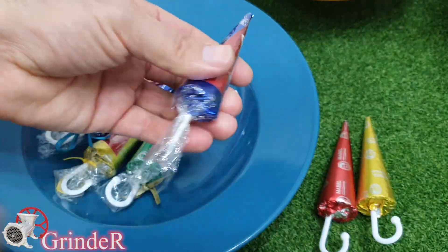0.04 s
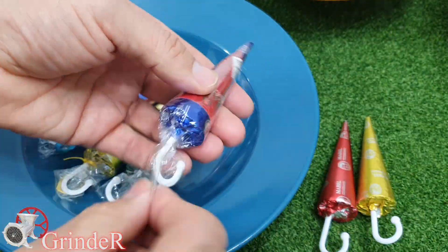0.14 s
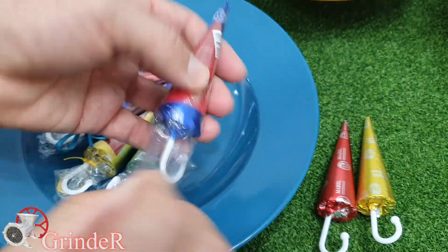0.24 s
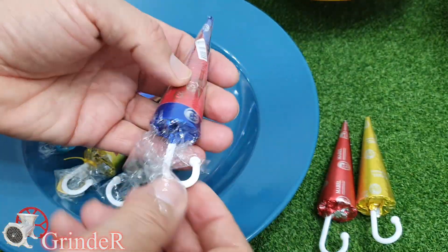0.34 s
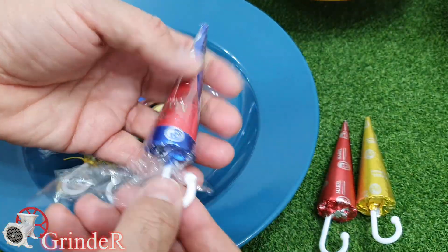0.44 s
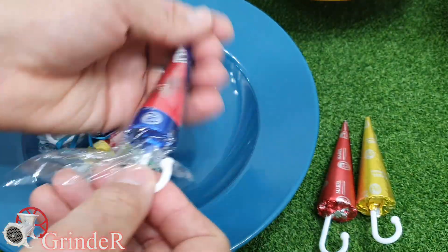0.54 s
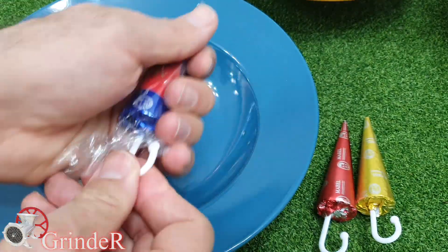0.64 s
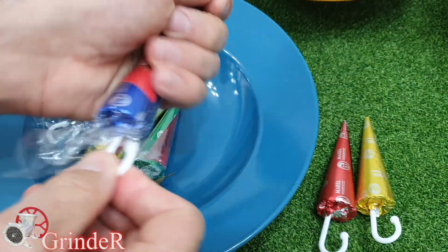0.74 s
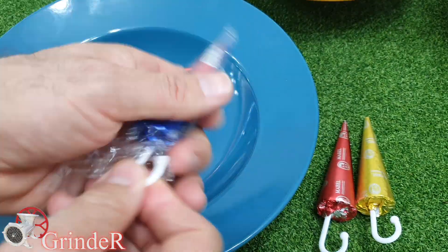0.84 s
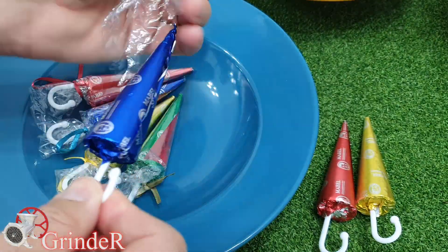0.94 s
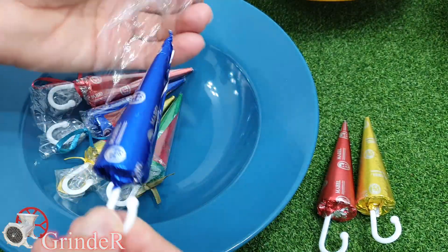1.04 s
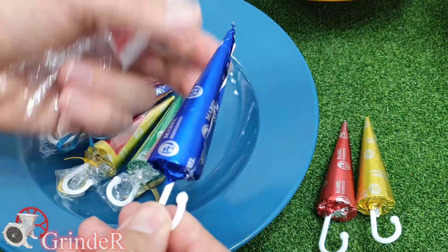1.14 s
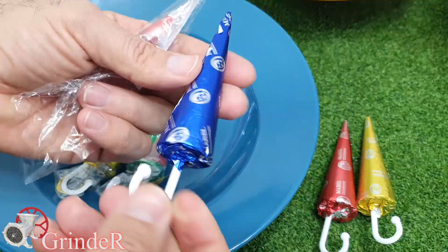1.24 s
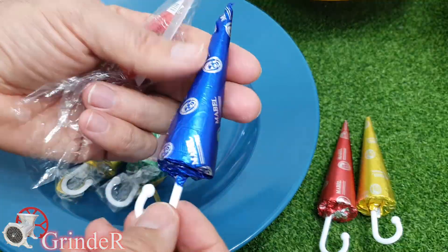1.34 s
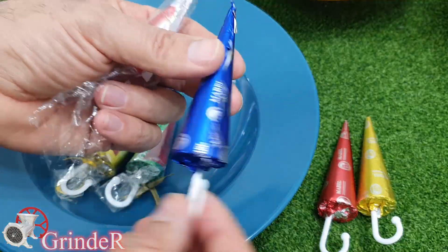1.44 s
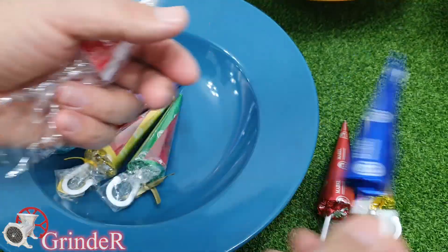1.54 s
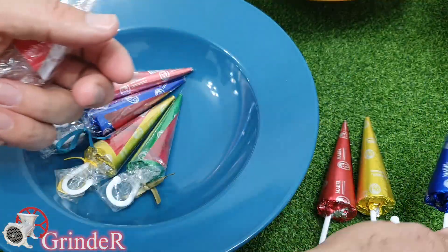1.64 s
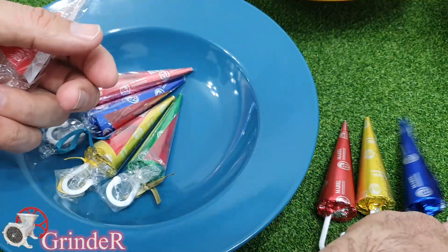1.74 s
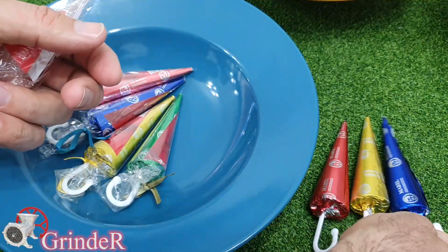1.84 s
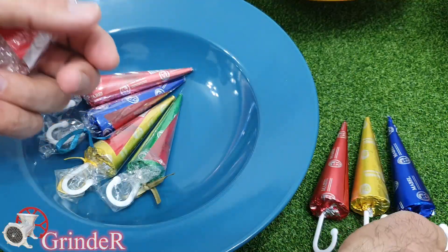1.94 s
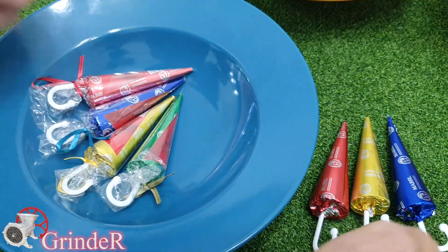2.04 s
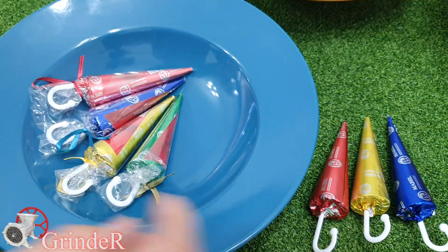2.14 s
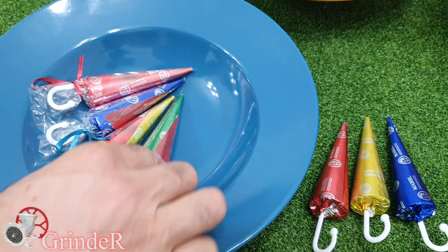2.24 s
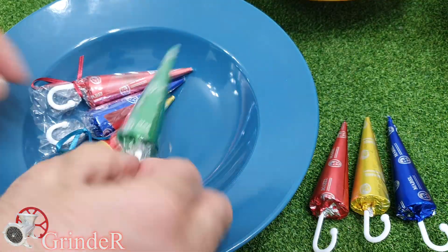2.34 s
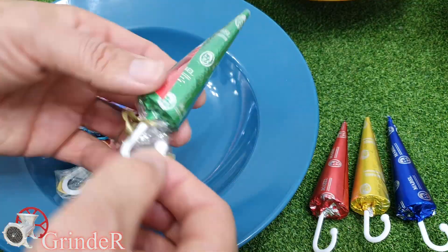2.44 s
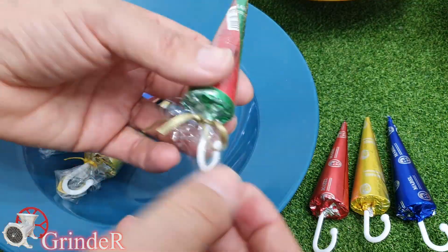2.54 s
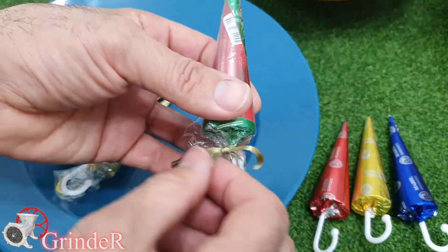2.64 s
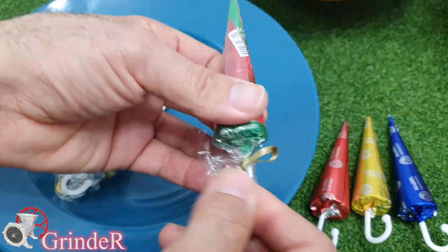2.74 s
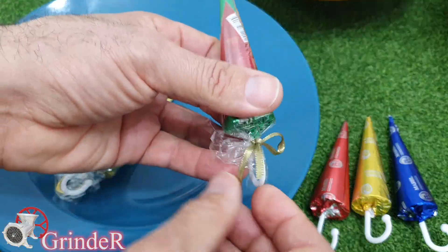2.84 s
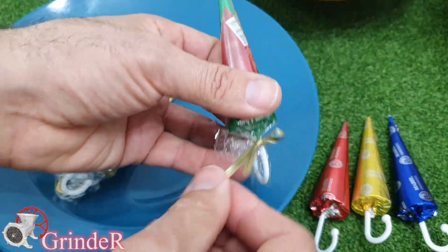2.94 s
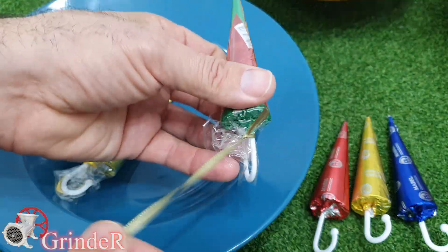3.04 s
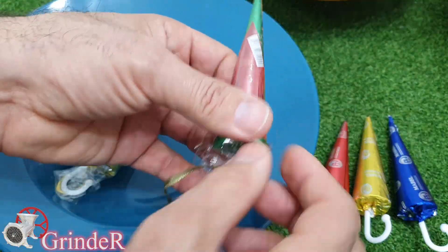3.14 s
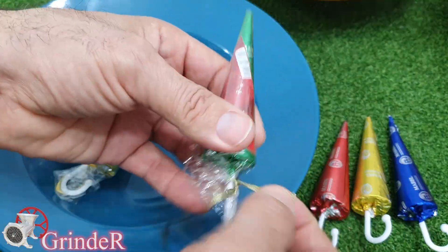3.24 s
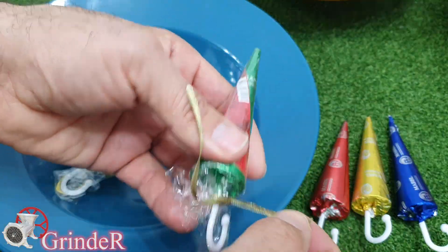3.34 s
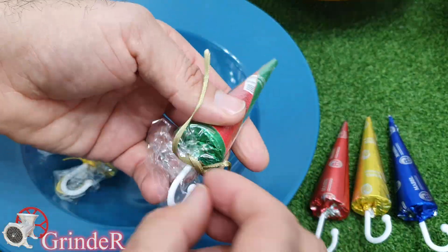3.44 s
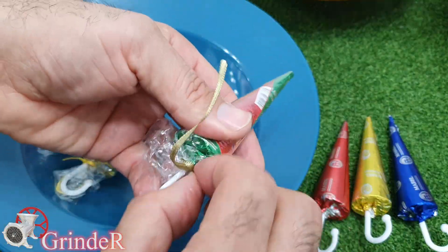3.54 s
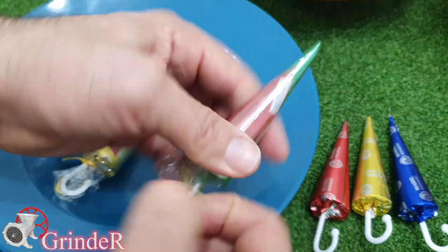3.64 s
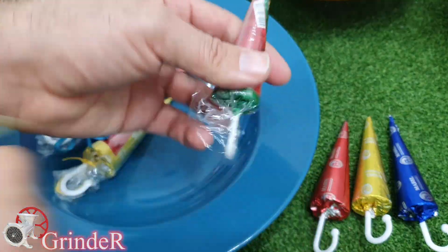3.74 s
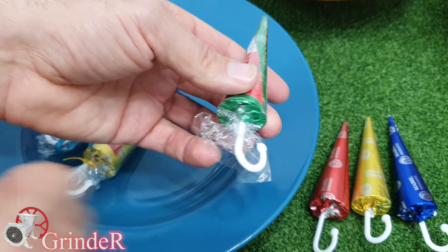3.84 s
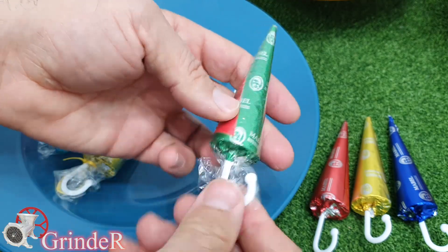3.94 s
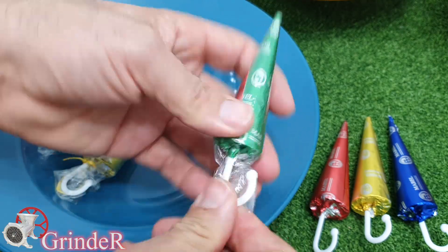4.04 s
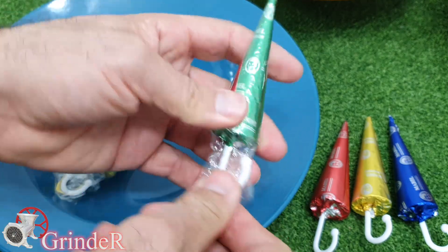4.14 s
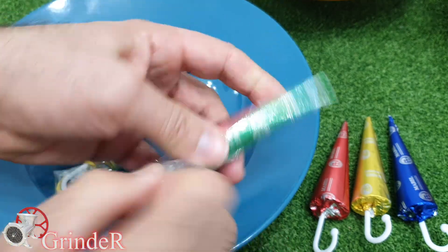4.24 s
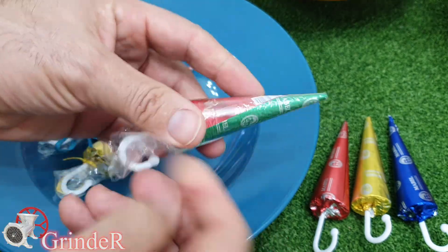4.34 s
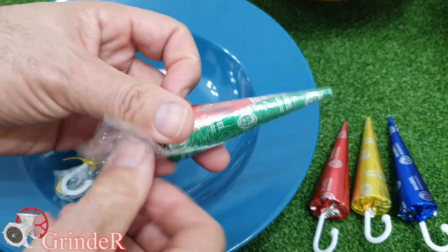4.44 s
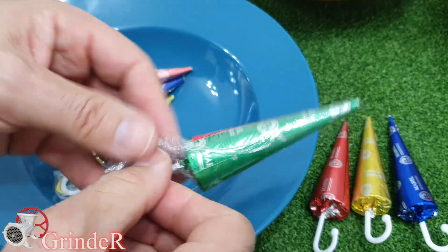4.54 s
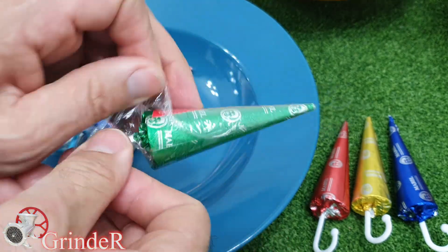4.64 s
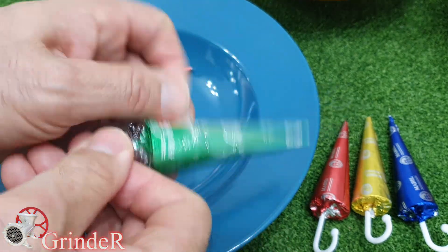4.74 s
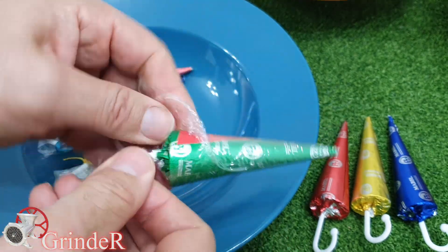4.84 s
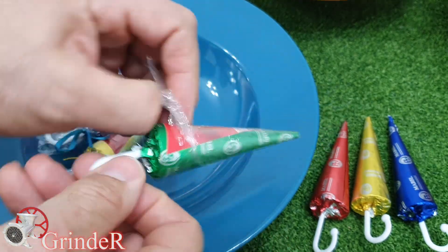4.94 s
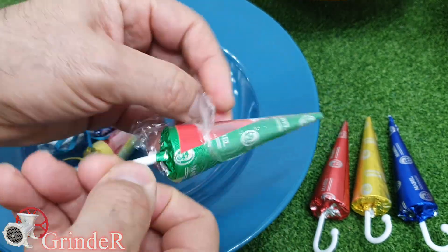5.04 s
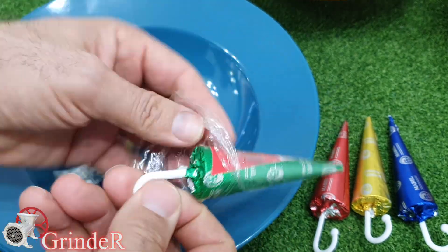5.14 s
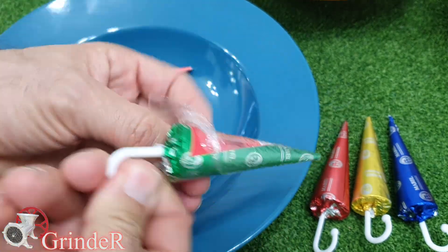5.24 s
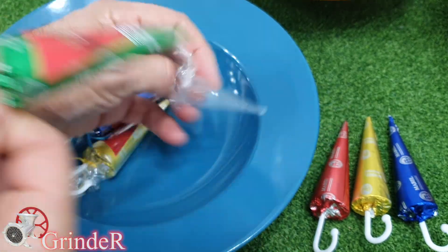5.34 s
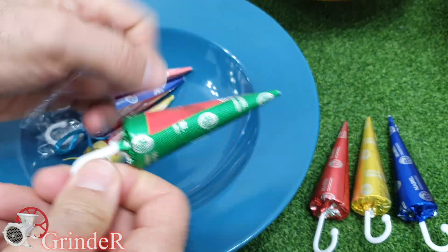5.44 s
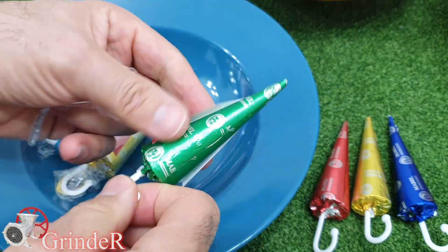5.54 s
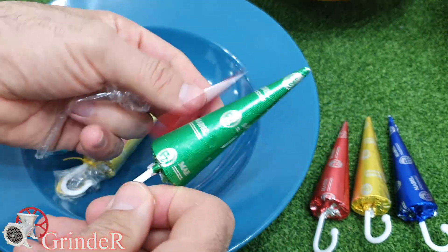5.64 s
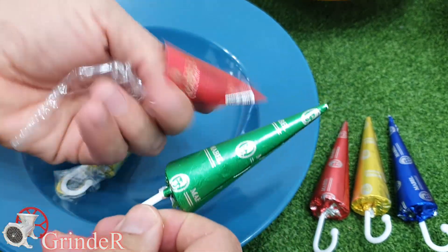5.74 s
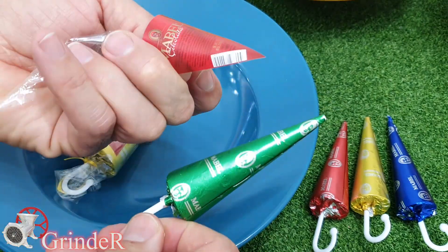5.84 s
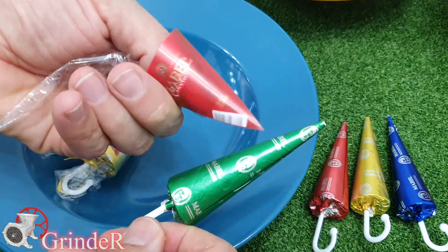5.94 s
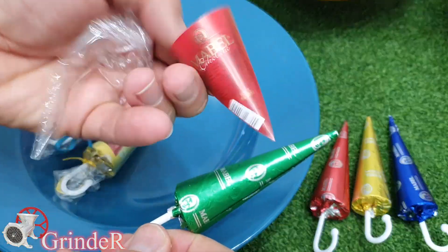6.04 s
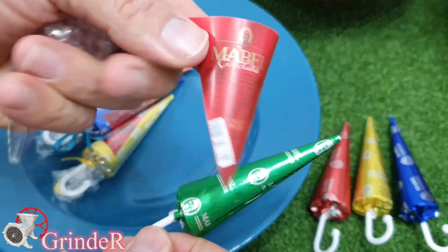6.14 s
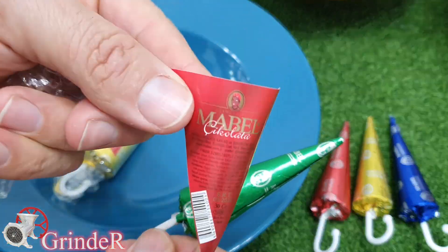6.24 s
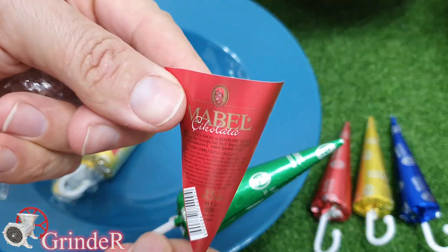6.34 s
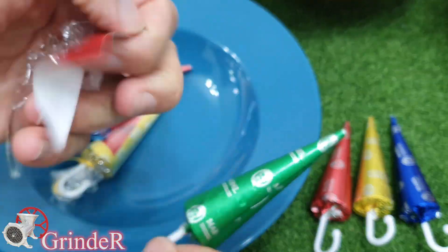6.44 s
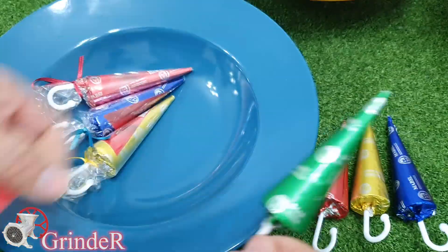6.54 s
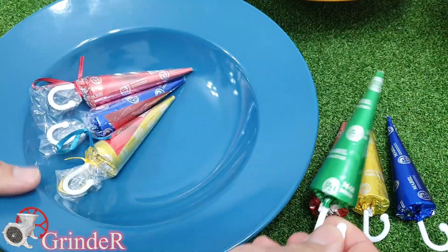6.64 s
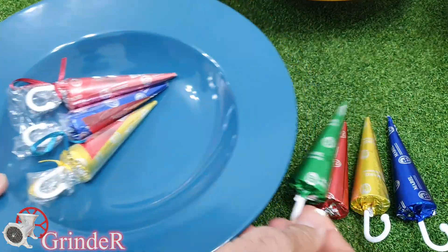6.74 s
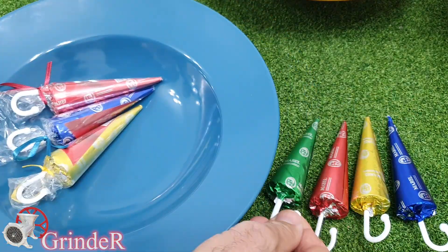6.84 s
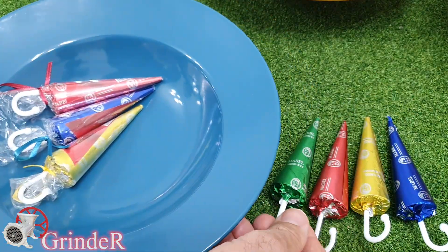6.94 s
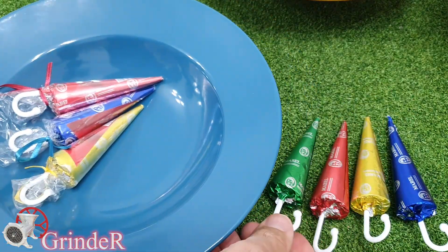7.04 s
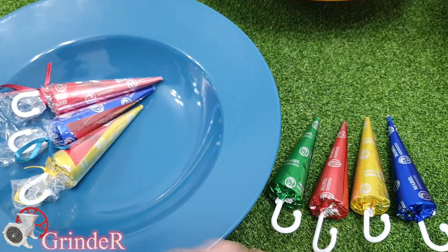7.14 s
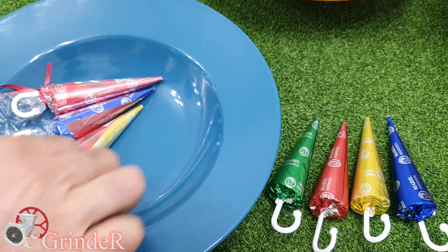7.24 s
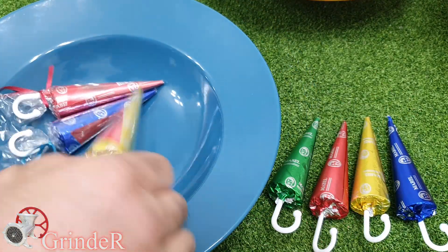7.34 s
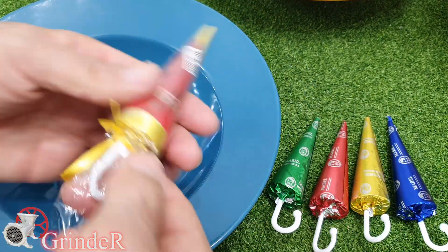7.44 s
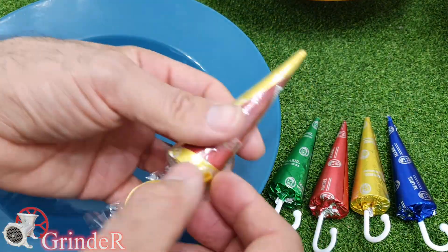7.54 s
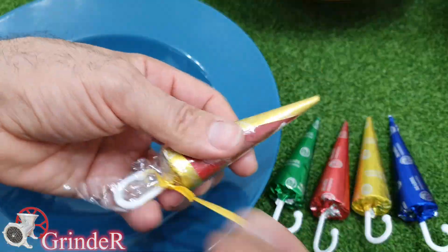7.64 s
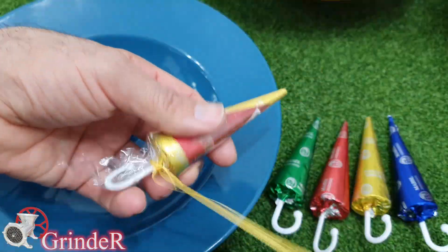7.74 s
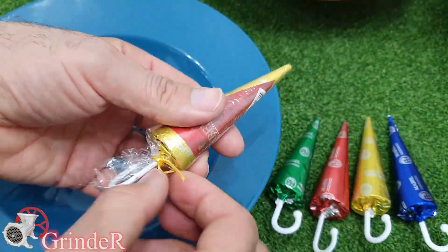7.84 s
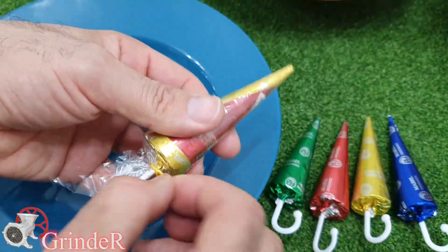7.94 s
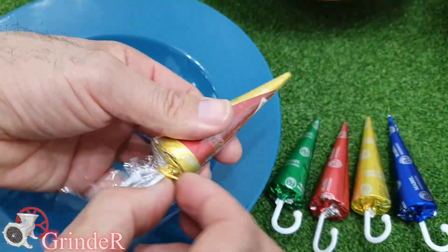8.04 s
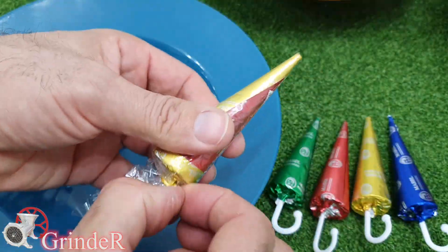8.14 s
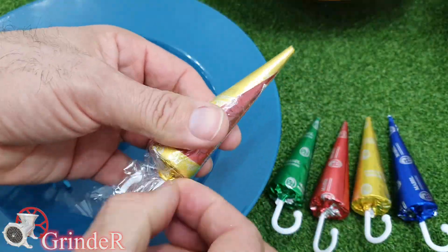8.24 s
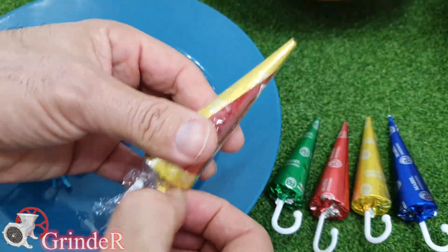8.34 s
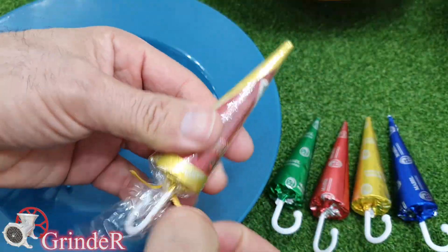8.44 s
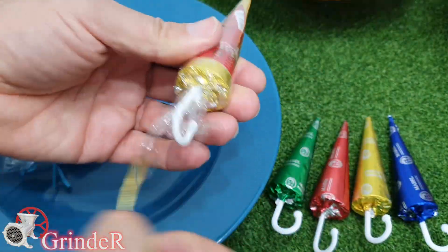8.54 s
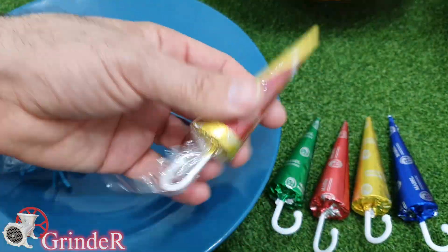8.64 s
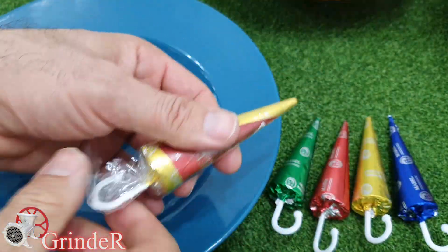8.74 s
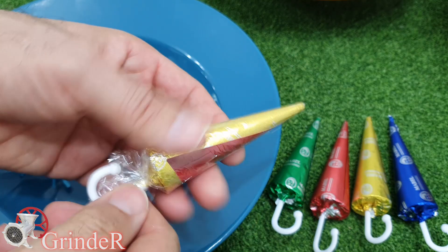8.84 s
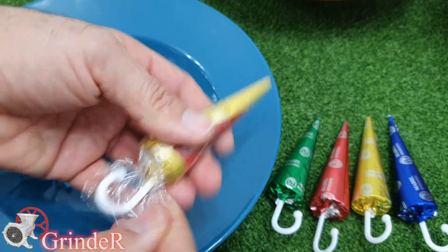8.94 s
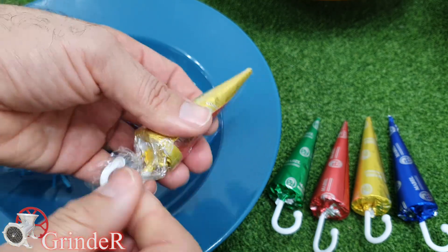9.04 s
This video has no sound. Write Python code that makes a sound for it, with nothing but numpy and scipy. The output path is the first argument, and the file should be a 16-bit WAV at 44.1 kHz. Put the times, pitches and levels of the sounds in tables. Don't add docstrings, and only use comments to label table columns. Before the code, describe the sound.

Close, dry stereo sound in a small quiet room with low air and faint hiss. From about 0.15 s crisp cellophane bursts out in bright crackles and hard snaps, strong near 0.3 and 0.9 s, thinning by 1.5 s to near silence. At 2.1 s a sweet is picked up with a fuller crinkle, a soft thud and a tiny plate ring at 2.35; light, scattered rustles and ticks continue until 3.7, when a snappier cluster comes. From 3.9 to 5.6 s the film is torn and crumpled: dense, loud crackling, with very sharp snaps around 4.1, 4.7 and 4.9. It subsides to fine, high ticks by 6. A stiff label clicks at 6.46, followed by a patter of soft padded knocks around 6.75. Gentle intermittent crinkling resumes from 7.1, with a thud at 7.3 and small snaps, quiet around 8.6, then a vigorous bright burst from 8.8 to the end at 9.1.

```python
import sys
import numpy as np
from scipy import signal
from scipy.fft import rfft, irfft, next_fast_len
from scipy.io import wavfile
from scipy.ndimage import uniform_filter1d, minimum_filter1d, map_coordinates

SR = 44100
rng = np.random.default_rng(int(sys.argv[2]) if len(sys.argv) > 2 else 0)


def unload_audio(sound):
    columns = np.transpose(np.atleast_2d(sound))
    steps = np.round(np.clip(columns, -1, 1) * 32767)
    wavfile.write(sys.argv[1], SR, steps.astype(np.int16))


def to_linear_factor(level_db):
    exponent = np.asarray(level_db, float) / 20
    return 10 ** exponent


N = 400869

GRAIN_SAMPLES, PRE_SAMPLES = 128, 32
GRIP_DB_PER_S, SAG_DB_PER_S, LET_GO_DB_PER_S = 799, 27.5, 559.5
AIR_DB, AIR_STIR_DB_PER_DB = -74, 0.13
LOUDEST_SNAP_DB = -11.5
FINEST_HZ = 12500

# f/Hz, level/dB per Hz
AIR_SPECTRUM = [(18, -67), (30, -33), (112, -26.5), (189, -11.5), (280, -9), (2120, -25.5)]
# f/Hz, width/Hz, level/dB
HUMS = [(199, 9.9, 1.5), (292, 13, 1), (422, 12, -3), (524, 7, -0.5)]
# f/Hz, level/dB per Hz
HISS_SPECTRUM = [(710, -18), (1200, -7), (1730, -9.5), (4800, -9), (16000, -17)]
# t/s, left-right/dB, deep folds (relative) level/dB
PLACE = [(0, 3.5, -21), (.25, -0.5, -3), (.6, 1.5, -19.5), (.93, 1.5, -7), (1.4, 3.5, -21), (2.15, 2.5, -2),
         (2.8, 0.5, -12), (3.7, 2, -13), (4.2, 1.2, -17), (4.7, 3.5, -19), (5.45, 1.5, -14),
         (6.3, 5.5, -11), (6.8, 1.3, -6.5), (7.5, 2.5, -11.5), (9.09, 2, -18)]
# t/s, f/Hz
FACETS = [(0, 7060), (2.15, 9050), (2.4, 6100), (3.7, 6290), (4.6, 4990), (4.8, 5140), (5.6, 6560),
          (6.05, 12320), (6.6, 10800), (6.8, 6020), (7.2, 8980), (7.5, 6970), (9.09, 5930)]
# f/Hz, level/dB per Hz
FINE_SPECTRUM = [(2060, -29), (3500, -11), (4940, -4.5), (6610, -1), (8510, -0.5), (11000, 3), (13400, 7),
                 (16000, 4.5), (16500, -62.5)]
# f/Hz, level/dB per Hz
BROAD_SPECTRUM = [(300, -60), (600, -26), (1000, -15.5), (1600, -12), (2300, -8), (3100, 3), (4000, -5),
                  (5000, 0.5), (8000, -45.5)]
# f/Hz, phase/rad
LEFT_LEAD = [(0, 2), (2240, 0.08), (4820, 2), (8440, 2.5), (10700, 4.5), (16400, 4)]
# f/Hz, t60/s
WALLS = [(300, 0.08), (2000, 0.16), (12000, 0.15)]
# t/s, hold/s, fine level/dB, broad (relative) level/dB, brightness/dB
FIRST_MOVES = [(0.033, 0.12, -63, -17, 7), (0.191, 0.01, -28, -11.5, 2), (0.189, 0.26, -37.5, -9.5, 2),
               (0.214, 0.012, -27.5, -13, 4), (0.251, 0.073, -32.5, -9, 1.0), (0.504, 0.072, -41, -10, 7.5),
               (0.654, 0.14, -33.5, -12, 8), (0.898, 0.022, -23, -13.5, 6), (0.948, 0.079, -40, -15, -5),
               (1.119, 0.29, -39.5, -14.5, 2), (1.435, 0.17, -57.5, -14, 1), (1.848, 0.089, -73, -4, 2)]
RIBBON_MOVES = [(2.027, 0.04, -63.5, -13.5, -6), (2.112, 0.033, -35.5, -19.5, 4), (2.225, 0.052, -48, 3, 4),
                (2.173, 0.17, -41, -19, 4.5), (2.298, 0.076, -39.5, -14.5, 0), (2.438, 0.079, -41, -24, 9),
                (2.547, 0.023, -44.5, -15, -5), (2.657, 0.031, -51.5, -11, 6),
                (2.733, 0.089, -46.5, -14, 7), (2.862, 0.173, -58, -23, 3), (3.036, 0.0058, -48.5, -16, -1),
                (3.09, 0.022, -59, -23, 7), (3.165, 0.08, -61, -25, -7), (3.254, 0.054, -40.5, -15.5, 0.5),
                (3.368, 0.02, -41.5, -11, 3), (3.441, 0.02, -56.5, -37, 7), (3.501, 0.086, -48, -16, 6),
                (3.614, 0.04, -46.5, -12, 6), (3.694, 0.045, -35.5, -15, -2.5), (3.78, 0.05, -57.5, -16, 8)]
SLEEVE_MOVES = [(3.873, 0.064, -43.5, -18, 6), (3.962, 0.1, -34.5, -13, 4.5), (4.089, 0.1, -31, -19, 8),
                (4.195, 0.0034, -26.5, -5, -1), (4.241, 0.12, -35, -9.5, 4), (4.437, 0.086, -38, -13, 7.5),
                (4.55, 0.024, -32.5, -9.5, 7), (4.607, 0.067, -24, -10.5, 10),
                (4.685, 0.041, -19.5, -17.5, 9.5), (4.75, 0.056, -33.5, -12.5, 9.5),
                (4.835, 0.019, -35.5, -9.5, 14), (5.475, 0.033, -31, -17, 10.5),
                (4.889, 0.078, -30, -13.5, 4.5), (4.993, 0.071, -35, -12, 11),
                (5.099, 0.055, -35.5, -10, 3), (5.174, 0.029, -34, -11.5, 2), (5.252, 0.087, -28, -16.5, 9),
                (5.385, 0.03, -39, -10, 5), (5.426, 0.041, -29, -14.5, 6), (5.533, 0.11, -45, -24, 12),
                (5.706, 0.05, -39.5, -28, 9), (5.775, 0.067, -38.5, -24, 4), (5.937, 0.034, -44, -27, -0.5),
                (5.98, 0.052, -53, -32, -4), (4.38, 0.041, -44.5, -11.5, 6),
                (6.046, 0.19, -44.5, -20.5, 4.5), (6.255, 0.037, -56, -30, 6), (6.315, 0.027, -51, -34, 5),
                (6.41, 0.038, -58, -30, 2)]
THIRD_MOVES = [(6.47, 0.095, -43, -18.5, 6.5), (6.599, 0.13, -45, -27, 7.5), (6.725, 0.11, -47.5, -8, -6),
               (6.86, 0.043, -62, -10, 1), (6.952, 0.18, -63, -11, 6), (7.102, 0.083, -50, -18.5, 4.5),
               (7.164, 0.25, -46, -15.5, 8), (7.265, 0.13, -40.5, -16, -2), (7.461, 0.057, -36.5, -19, 1),
               (7.619, 0.11, -51.5, -20, 1.5), (7.776, 0.023, -44.5, -16.5, 4), (7.885, 0.043, -54, -21, 2),
               (7.97, 0.052, -47.5, -12.5, 6), (8.093, 0.076, -51.5, -16, 5),
               (8.149, 0.074, -60.5, -18, -1), (8.303, 0.068, -47, -18, 5.5),
               (8.422, 0.038, -48.5, -12.5, 11), (8.501, 0.027, -40, -9, 5), (8.589, 0.19, -66.5, -16, 2),
               (8.789, 0.079, -37.5, -14, 7.5), (8.91, 0.09, -29, -14.5, 8.5), (9.045, 0.06, -35, -14, 6)]
# t/s, peak level/dB, low body (relative) level/dB, flurry (relative) level/dB
FIRST_SNAPS = [(0.152, -14.5, -18, -28.5), (0.182, -13, -22, -22), (0.2678, -6, -20.5, -23),
               (0.303, -25, -10, -27), (0.389, -13.5, -11.5, -27), (0.539, -16, -20, -22),
               (0.638, -19.5, -15.5, -20.5), (0.6818, -10.5, -35, -22.5), (0.7576, -27, -17.5, -25),
               (0.8615, -18, -24.5, -17.5), (0.9038, -4.5, -15.5, -24.5), (1.085, -24.5, -22, -18.5),
               (1.197, -18.5, -14, -30), (1.2242, -17, -32.5, -29), (1.38, -18.5, -24, -36)]
RIBBON_SNAPS = [(2.0963, -24, -36, -31), (2.109, -19, -42, -19), (2.3459, -18.5, -3, -22.5),
                (2.4317, -25, -19, -22), (2.557, -15.5, -15.5, -29.5), (2.653, -26.5, -14.5, -23.5),
                (2.884, -32.5, -15, -14), (3.031, -24, -28, -25), (3.2165, -23.5, -38, -27.5),
                (3.3573, -29, -30, -31), (3.684, -21, -28, -18), (3.714, -15.5, -25, -18.5),
                (3.722, -13.5, -30, -18.5)]
SLEEVE_SNAPS = [(3.9565, -25.5, -5, -29), (4.0889, -2.5, -32, -23.5), (4.197, -3, -13, -18),
                (4.2833, -11, -23, -17), (4.4578, -10, -19.5, -30), (4.552, -25, -23, -33),
                (4.592, -15, -23, -20), (4.803, -23, -8.5, -24), (4.8862, 2, -39, -33),
                (4.8973, -9, -30, -34), (4.917, -8, -10.5, -19), (5.1252, -13, -29, -20),
                (5.2, -11.5, -33, -29), (5.247, -8.5, -39, -32), (5.4472, -10.5, -19, -15),
                (6.1745, -26, -42, -16.5), (6.4353, -31, -23, -21.5), (6.631, -23.5, -40, -19)]
THIRD_SNAPS = [(7.129, -27.5, -36, -23), (7.2926, -21, -19, -23), (7.609, -29, -19.5, -24),
               (7.905, -26.5, -34, -23.5), (7.97, -31, -11, -28), (8.35, -23, -35, -32),
               (8.4318, -25.5, -17, -18), (8.771, -20.5, -15, -19), (8.8296, -13.5, -19, -17.5),
               (8.9104, -8, -20, -19.5), (8.9429, -7.5, -24, -24), (8.9925, -21, -11.5, -20),
               (9.063, -16.5, -23, -14), (9.0865, -13, -32, -28),
               (6.7448, -19, -24, -30),
    (7.4694, -14, -30, -30),
    (7.9947, -21, -32, -34),
    (8.4147, -24, -22, -32),
]
# t/s, peak level/dB, f/Hz
SINGLE_TICKS = [(0.2005, -16.5, 8000), (0.3052, -20.5, 2800), (0.5215, -31, 11200), (0.6552, -23, 10400),
                (0.698, -17, 6100), (0.8455, -21, 10500), (0.9543, -24, 8300), (1.0003, -25, 9100),
                (1.1244, -28, 7200), (1.2394, -24, 10200), (1.2602, -29, 12900), (1.2665, -27, 11500),
                (1.348, -27, 10000), (2.1285, -26.5, 10500), (2.2029, -26, 11600), (2.3414, -19, 2500),
                (2.4513, -35, 9200), (2.5059, -24, 11200), (2.5229, -28, 12600), (2.5533, -32, 11100),
                (2.5663, -24, 13700), (2.7205, -30, 8500), (2.746, -25.5, 6900), (2.7932, -29, 9600),
                (2.7991, -37, 6000), (3.1139, -35.5, 13000), (3.0937, -38, 6900), (3.221, -25, 7000),
                (3.3772, -28, 3800), (3.5049, -31, 3000), (3.51, -29, 7000), (3.5239, -32, 10800),
                (3.5359, -26, 8400), (3.609, -33, 12500), (3.639, -31, 9000), (3.6532, -25.5, 7800),
                (3.6884, -15, 6100), (3.9646, -16.5, 2900), (3.9682, -31, 7300), (4.0425, -18, 6200),
                (4.0517, -22, 7600), (4.0802, -27, 8100), (4.0927, -9.5, 7300), (4.0957, -11, 8000),
                (4.1519, -10.5, 6900), (4.1587, -14, 8600),
                (4.1829, -16, 6670), (4.262, -16, 6500), (4.3309, -31, 3000), (4.3849, -30, 12600),
              (4.4404, -23, 13300), (4.4685, -16, 14200), (4.5159, -19, 12240), (4.546, -16, 11700),
              (4.555, -14, 12900), (4.6459, -13.5, 4400), (4.851, -19, 5900), (4.8912, -3.5, 10000),
              (4.913, -13, 6200), (4.9162, -2, 11400), (4.92, -16, 10200), (4.9283, -16, 3700),
              (5.1078, -19, 3060), (5.204, -18, 11300), (5.2734, -14, 8500), (5.5138, -30, 12700),
              (5.679, -22, 12500), (5.75, -19, 12600), (5.8325, -22.5, 11500), (5.9429, -32, 5000),
              (5.9519, -30.5, 3300), (6.0973, -25, 14000), (6.1795, -28, 12400), (6.2295, -26.5, 12400),
              (6.6094, -29, 11500), (7.1346, -22, 8900), (7.1803, -25, 10300), (7.4899, -20, 13700),
              (7.509, -22, 9700), (7.7141, -36, 9700), (7.7169, -31, 10800), (7.8936, -36, 13300),
              (7.4005, -30, 4160), (8.0195, -28, 10700), (8.208, -30.5, 13000), (8.8011, -19.5, 13600),
              (8.8116, -30, 12500), (8.8368, -17, 12700), (9.0375, -19.5, 8600)]
# t/s, peak level/dB
FINE_TICKS = [(0.3623, -17), (0.4782, -28), (0.8227, -29), (1.1567, -25), (1.5308, -39), (1.7336, -47),
              (1.9782, -49), (2.849, -34), (3.1973, -35), (3.8277, -47), (4.0197, -23), (4.1145, -20),
              (4.3678, -25), (5.391, -24), (5.9619, -26), (6.0778, -33), (6.713, -34), (6.7338, -29),
              (7.0116, -41), (7.3678, -17), (7.576, -39), (7.7224, -34), (7.9349, -41), (7.9549, -37),
              (8.0144, -27), (8.0952, -38), (8.3676, -25), (8.468, -29), (8.6333, -44), (9.0036, -20),
              (9.0125, -19)]
# t/s, peak level/dB, f/Hz
CARD_FLICK = [
    (6.4636, -15, 13200),
    (6.4638, -26.5, 4220),
    (6.464, -26, 2500),
]
# f/Hz, level/dB per Hz
TICK_SPECTRUM = [(500, -44), (2000, -17.5), (4000, -5.5), (9000, -3.5), (16000, 1.5), (16500, -60.5)]
# t/s, peak level/dB
POPS = [(0.183, -37.5), (0.2, -32), (0.266, -34), (0.68, -47), (0.906, -30), (2.118, -49), (2.339, -39),
        (3.685, -43.5), (4.197, -48), (4.265, -43), (4.55, -34), (4.586, -46), (4.61, -36), (4.722, -43),
        (4.801, -31), (4.916, -33.5), (4.958, -30), (5.318, -33.5), (5.421, -40), (5.452, -39), (5.95, -51),
        (6.462, -41.5), (7.509, -38.5), (8.512, -41), (8.789, -43), (8.912, -53)]
# f/Hz, level/dB per Hz
POP_SPECTRUM = [(0, -39.5), (350, -9.5), (1000, -6.5), (2000, -2.5), (3500, -7), (7000, -40.5)]
# t/s, peak level/dB, f/Hz
KNOCKS = [(0.912, -50.5, 565), (1.787, -66, 422), (2.227, -52, 406), (2.346, -44, 388), (3.824, -48, 380),
          (3.964, -61, 240), (6.465, -59.5, 283), (6.695, -63, 343), (6.742, -58, 396), (6.759, -49, 399),
          (6.777, -47.5, 384), (6.798, -52, 402), (6.819, -59, 402), (6.85, -58.5, 416), (6.89, -61.5, 392),
          (7.304, -44, 378), (8.696, -56.5, 300)]
# f/Hz, level/dB per Hz
THUD_SPECTRUM = [(100, -28), (170, -7), (400, 2.5), (700, -14), (1100, -15), (2500, -34)]
# t/s, level/dB
TAPS = [
    (2.346, -46.5),
    (7.165, -76),
]
# f/Hz, level/dB, t60/s
PLATE_MODES = [(1012, -7, .16), (1803, -12, .2), (1965, 2, .36), (2676, 3, .16), (2790, 1, .11),
               (4587, -4, .1)]
# t/s, length/s, f/Hz, level/dB
RUBS = [
    (1.9, .13, 1036, -84),
    (4.425, 0.089, 549, -67.5),
    (4.546, 0.086, 428, -59.5),
    (5.78, .19, 292, -72),
    (5.98, .18, 202, -77),
]


def unit(x):
    return x / np.sqrt(np.mean(np.mean(x, axis=0) ** 2) + 1e-20)


def peak_unit(shapes):
    return shapes / np.abs(shapes.mean(axis=1)).max(axis=1)[:, None, None]


def along(points, hz):
    f, v = np.transpose(points)
    return np.interp(np.log(hz + 1), np.log(f + 1), v)


def curves(rows):
    s, *cols = np.transpose(rows)
    return [np.interp(np.arange(N) / SR, s, c) for c in cols]


def samples(s):
    return np.round(s * SR).astype(int)


def wobble(rate_hz):
    knots = rng.standard_normal(int(N * rate_hz / SR) + 4)
    return map_coordinates(knots, [np.arange(N) * rate_hz / SR])


def filtered(x, response):
    m = next_fast_len(N + SR // 2)
    return irfft(rfft(x, m) * response(np.fft.rfftfreq(m, 1 / SR)), m)[..., :N]


def shaped_noise(channels, spectrum):
    return unit(filtered(rng.standard_normal((channels, N)), lambda hz: to_linear_factor(along(spectrum, hz))))


def panned(pan_db):
    return to_linear_factor(np.array([pan_db / 2, -pan_db / 2]))


def room_air():
    level_db = AIR_DB + AIR_STIR_DB_PER_DB * uniform_filter1d(handling()[0] + 45, size=SR // 2)
    common, left, right = rng.standard_normal((3, N))
    ports = np.array([common + 1.4 * left, common + 1.35 * right])
    air = unit(filtered(ports, lambda hz: to_linear_factor(along(AIR_SPECTRUM, hz)) * (hz < 1500)))
    for hz, width_hz, db in HUMS:
        line = lambda f: 1j * f * width_hz / (hz * hz - f * f + 1j * f * width_hz)
        hum = unit(filtered(rng.standard_normal((1, N)), line))
        air = air + to_linear_factor(db - 17.0 + 4.5 * wobble(4)) * hum
    return to_linear_factor(level_db + 2.1 * wobble(6)) * air + to_linear_factor(-76.5) * shaped_noise(2, HISS_SPECTRUM)


def handling():
    moves = np.transpose(FIRST_MOVES + RIBBON_MOVES + SLEEVE_MOVES + THIRD_MOVES)
    s, hold_s, db, broad_db, bright_db = moves[..., None]
    t = np.arange(0, N / SR + .002, .002)
    u = t - s
    fall_db = GRIP_DB_PER_S * np.maximum(-u, 0)
    fall_db = fall_db + SAG_DB_PER_S * np.clip(u, 0, hold_s)
    fall_db = fall_db + LET_GO_DB_PER_S * np.maximum(u - hold_s, 0)
    power = to_linear_factor(2 * (db - fall_db))
    total = power.sum(axis=0)
    mixed = lambda v: (power * v).sum(axis=0) / total
    return curves(np.transpose([t, 10 * np.log10(total), mixed(broad_db), mixed(bright_db)]))


def all_snaps():
    return np.transpose(FIRST_SNAPS + RIBBON_SNAPS + SLEEVE_SNAPS + THIRD_SNAPS)


def effort(level_db):
    s, db, _, flurry_db = all_snaps()
    kicks = np.bincount(samples(s), to_linear_factor(2 * (db + flurry_db)), N)
    t = np.arange(-SR // 20, SR // 20 + 1) / SR
    flurry = np.exp(-np.abs((t - .0035) / .0068) ** 2.4)
    return np.sqrt(to_linear_factor(2 * (level_db - 1.5)) + np.abs(signal.fftconvolve(kicks, flurry, "same")))


def creases(facet_hz, spectrum, t60, alike, peak_db):
    t, hz = np.arange(GRAIN_SAMPLES) / SR, np.fft.rfftfreq(GRAIN_SAMPLES, 1 / SR)
    draw = rng.standard_normal((len(facet_hz), 3 * GRAIN_SAMPLES + 2))
    life_s = t60 * to_linear_factor(0.68 * draw[:, -1:])
    shape = (1 - np.exp(-t / 0.00036)) * to_linear_factor(-60 * t / life_s)
    rattle = draw[:, :-2].reshape(-1, 3, GRAIN_SAMPLES) * shape[:, None]
    pair = np.sqrt(alike) * rattle[:, :1] + np.sqrt(1 - alike) * rattle[:, 1:]
    resonance = np.exp(-(np.log((hz + 1) / facet_hz[:, None]) / 0.37) ** 2)
    colour = to_linear_factor(along(spectrum, hz) + peak_db * resonance)
    lead = np.outer(1 + 0.24 * draw[:, -2], along(LEFT_LEAD, hz)) / 2
    ports = np.exp(1j * np.stack([lead, -lead], axis=1))
    delay = np.exp(-2j * np.pi * hz * PRE_SAMPLES / SR)
    return irfft(rfft(pair) * colour[:, None] * ports * delay)


def scattered(starts, shapes):
    at = (np.clip(starts - PRE_SAMPLES, 0, N)[:, None] + np.arange(GRAIN_SAMPLES)).ravel()
    return np.array([np.bincount(at, shapes[:, c].ravel(), N + GRAIN_SAMPLES)[:N] for c in (0, 1)])


def swarm(count, spectrum, centre_hz, t60, spread_db, clump):
    starts = np.sort(rng.integers(0, N, count))
    avalanche_db = (0.72 * clump[0] + 2.45 * clump[1])[starts]
    size_db = spread_db * rng.exponential(size=count) + avalanche_db
    pitch_db = 2.66 * wobble(18)[starts] + 2.03 * rng.standard_normal(count)
    facet_hz = (centre_hz + np.zeros(N))[starts] * to_linear_factor(pitch_db)
    shapes = creases(facet_hz, spectrum, t60, alike=0.69, peak_db=6)
    shapes /= np.linalg.norm(shapes, axis=(1, 2), keepdims=True)
    return unit(scattered(starts, shapes * to_linear_factor(size_db)[:, None, None]))


def patchy(x, depth_db):
    z = signal.stft(x, nperseg=256)[2]
    field = uniform_filter1d(rng.standard_normal(z.shape[1:]), size=10, axis=0)
    field = uniform_filter1d(field, size=12, axis=1)
    return signal.istft(z * to_linear_factor(depth_db * field / field.std()), nperseg=256)[1][:, :N]


def crinkle():
    level_db, broad_db, bright_db = handling()
    pan_db, deep_db = curves(PLACE)
    clump = [wobble(45), wobble(160)]
    fine = swarm(20000, FINE_SPECTRUM, curves(FACETS)[0], t60=0.0033, spread_db=.9, clump=clump)
    needles = swarm(2000, FINE_SPECTRUM, 9200, t60=0.0012, spread_db=1.5, clump=clump)
    fine = patchy(fine + to_linear_factor(-12) * needles, depth_db=1.58)
    bright = filtered(fine, lambda hz: 1 / (1 + (9800 / (hz + 1)) ** 8))
    broad = swarm(9000, BROAD_SPECTRUM, 2500, t60=0.0052, spread_db=1.0, clump=[clump[0], wobble(160)])
    deep = filtered(broad, lambda hz: 1 / (1 + (hz / 2100) ** 6))
    broad = broad + (to_linear_factor(deep_db + 14.5) - 1) * deep
    tilt_db = 0.53 * (bright_db - 7.5)
    film = to_linear_factor(tilt_db) * bright + to_linear_factor(-tilt_db) * (fine - bright)
    film = film + to_linear_factor(1.308 * broad_db + 7.0) * broad
    return panned(pan_db) * effort(level_db) * film


def walls(x):
    hz, t, z = signal.stft(rng.standard_normal((2, SR // 3)), SR, nperseg=256)
    tail = signal.istft(z * to_linear_factor(-60 * t / along(WALLS, hz)[:, None]), SR, nperseg=256)[1]
    delayed = np.pad(x, ((0, 0), (150, 0)))
    return signal.fftconvolve(delayed, tail / np.linalg.norm(tail[0]), axes=1)[:, :N]


def snaps():
    s, db, body_db, _ = all_snaps()
    facet = to_linear_factor(3 * rng.standard_normal(len(s)))
    crack = creases(9000 * facet, FINE_SPECTRUM, t60=0.0031, alike=0.72, peak_db=11.5)
    body = creases(2800 * np.sqrt(facet), BROAD_SPECTRUM, t60=.0025, alike=.85, peak_db=3)
    shapes = peak_unit(crack) + peak_unit(body) * to_linear_factor(1.3 * body_db + 12.5)[:, None, None]
    level = to_linear_factor(np.minimum(db - 5.0, LOUDEST_SNAP_DB))[:, None, None]
    return panned(curves(PLACE)[0]) * scattered(samples(s) + 30, shapes * level)


def pops():
    s, db = np.transpose(POPS)
    pop = peak_unit(creases(1400 + 0 * s, POP_SPECTRUM, t60=.005, alike=0.78, peak_db=6.0))
    return panned(curves(PLACE)[0]) * scattered(samples(s), pop * to_linear_factor(db + 2.5)[:, None, None])


def ticks():
    finest = [(s, db, FINEST_HZ) for s, db in FINE_TICKS]
    s, db, hz = np.transpose(SINGLE_TICKS + CARD_FLICK + finest)
    click = creases(hz, TICK_SPECTRUM, t60=.0008 + 6 / hz[:, None], alike=0.84, peak_db=14)
    click = peak_unit(click) * to_linear_factor(db - 1.0)[:, None, None]
    return panned(curves(PLACE)[0]) * scattered(samples(s) - 10, click)


def knocks():
    out, t = np.zeros(N + SR), np.arange(SR // 2) / SR
    wood = shaped_noise(1, THUD_SPECTRUM)[0]
    for s, db, hz in KNOCKS:
        start = round(s * SR)
        push = np.sin(2 * np.pi * hz * t) + 0.73 * np.resize(wood[start:], len(t))
        swell = to_linear_factor(db + 7.5 - 60 * t / 0.082) * (1 - np.exp(-t / 0.0052))
        out[start:][:len(t)] += swell * push
    for s, db in TAPS:
        ring = sum(to_linear_factor(level - 60 * t / t60) * np.sin(2 * np.pi * hz * t) for hz, level, t60 in PLATE_MODES)
        out[round(s * SR):][:len(t)] += to_linear_factor(db) * ring
    return out[:N]


def rubs():
    t, out = np.arange(N) / SR, 0
    for s, length_s, hz, db in RUBS:
        swell = np.clip(np.minimum(t - s, s + length_s - t) / 0.011, 0, 1)
        out = out + to_linear_factor(db) * swell * np.sin(2 * np.pi * hz * t)
    return out * to_linear_factor(3.4 * wobble(25))


def scene():
    film = crinkle() + snaps() + pops() + ticks()
    table = knocks() + rubs()
    return film + table + to_linear_factor(-10.0) * walls(film + 0.45 * table) + room_air()


def band_limit(x):
    return signal.sosfilt(signal.butter(12, 16830, fs=SR, output="sos"), x)


def record(dry):
    room = minimum_filter1d(.93 / np.maximum(np.abs(dry), .93), size=64)
    held = dry * uniform_filter1d(room, size=32)
    band = lambda hz: 1j * hz / (1j * hz + 90) / (1 + (hz / 15900) ** 150)
    return band_limit(filtered(held, band))


dry = scene()
out = record(dry)
unload_audio(out)
```